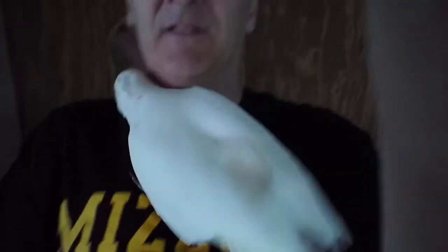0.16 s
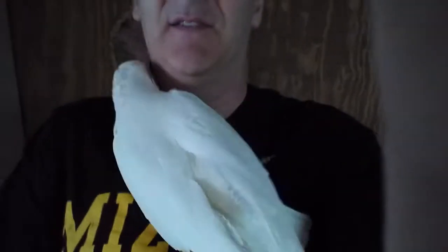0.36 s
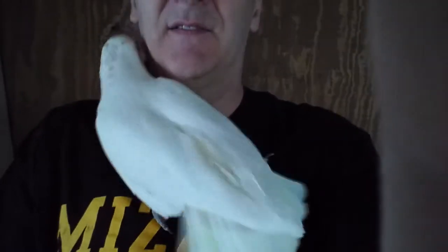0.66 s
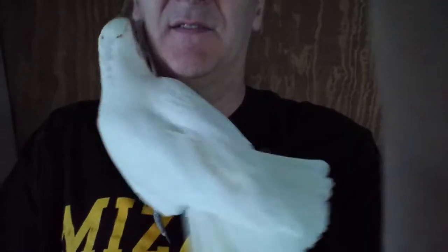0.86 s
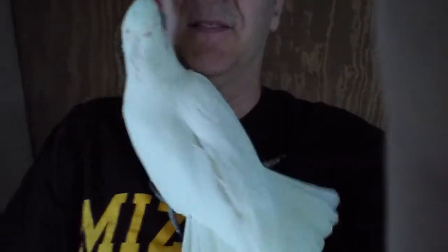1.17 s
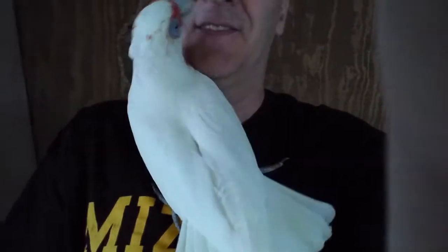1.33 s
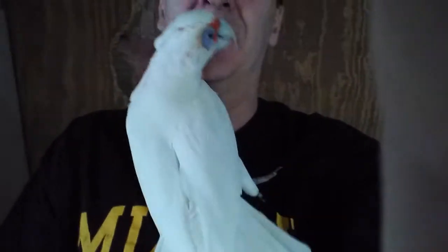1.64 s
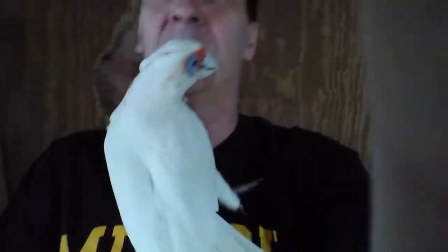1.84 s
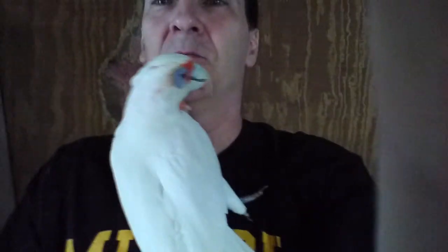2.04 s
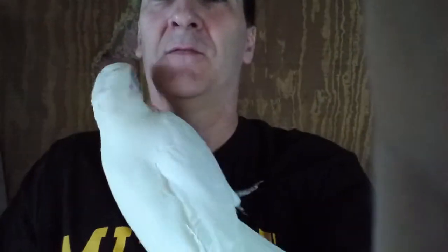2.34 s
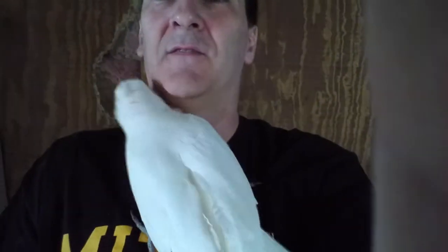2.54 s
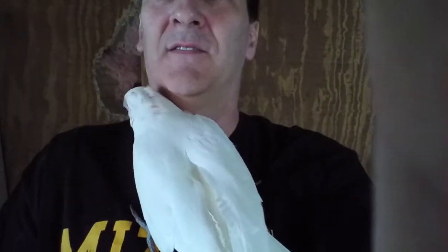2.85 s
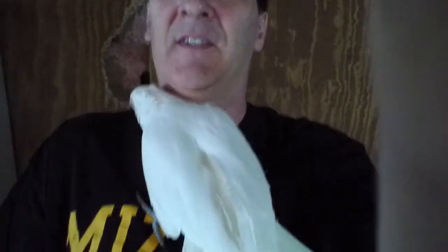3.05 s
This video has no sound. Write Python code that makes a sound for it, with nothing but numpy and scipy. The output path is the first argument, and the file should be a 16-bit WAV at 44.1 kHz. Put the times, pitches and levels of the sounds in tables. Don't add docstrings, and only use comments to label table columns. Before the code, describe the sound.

Close parrot calls in a bare, hard-walled room: long rough screeches, a short rasp, squeaking croaks, low mutters and high whistles, one final trilled screech, then faint rustles over low fan, hum and hiss.

```python
import sys
import numpy as np
from scipy import signal
from scipy.fft import rfft, irfft, next_fast_len
from scipy.io import wavfile
from scipy.ndimage import uniform_filter1d, minimum_filter1d, map_coordinates

SR = 44100
rng = np.random.default_rng(int(sys.argv[2]) if len(sys.argv) > 2 else 0)


def master(y):
    cut = np.clip(np.atleast_2d(y).T, -1, 1)
    pcm = np.round(cut * 32767)
    wavfile.write(sys.argv[1], SR, pcm.astype(np.int16))


def ratio_of_db(decibels):
    return 10 ** (np.asarray(decibels, float) / 20)


N = 141120

# start_s, length_s, start_pitch_hz, end_pitch_hz, level_db
SCREECH_CALLS = [
    (-.35, 0.24, 1258, 1233, -13),
    (.1, 0.62, 1268, 1240, -14.5),
    (1.05, .6, 1250, 1224, -14.5),
    (1.972, .58, 1238, 1216, -13.5),
]
RASP_CALLS = [
    (.655, .13, 970.4, 851, -15.5),
]
CROAK_CALLS = [
    (.845, 0.145, 910.7, 900.7, -13),
    (1.045, 0.142, 918.3, 903.5, -17),
    (1.225, 0.12, 894, 876, -32.5),
]
MUTTER_CALLS = [
    (1.48, .2, 537.3, 627.6, -26.5),
    (1.755, 0.14, 688, 696, -27),
]
RUSTLE_CALLS = [
    (2.71, 0.07, 896, 935, -41),
    (2.8, 0.048, 883, 925, -42),
]
SQUEAK_CALLS = [
    (.818, .026, 2900, 2740, -11),
    (.824, .014, 2750, 2450, -16),
    (.832, .03, 3820, 3600, -12),
    (1.013, .028, 2790, 2850, -12),
    (1.02, .035, 3860, 3580, -13),
    (1.203, .03, 3720, 3500, -13),
]
WHISTLE_CALLS = [
    (1.618, .08, 4450, 4500, -19),
    (1.735, .05, 4480, 4490, -27),
    (1.745, .025, 4850, 4860, -30),
    (1.76, .12, 6800, 6750, -39),
]
TRILL_CALLS = [
    (1.85, 0.029, 666, 677, -25),
    (1.885, .155, 662.2, 647, -20.5),
    (2.085, 0.057, 687.6, 675, -22),
]

# frequency_hz, level_db
SCREECH_COLOUR = [(500, -20.5), (950, -21.5), (1300, -10.5), (2000, -4), (2900, -8), (6600, -9),
                  (9000, -22), (15500, -41.5)]
RASP_COLOUR = [(500, -36), (800, -14.5), (1400, -21.5), (1900, -1.5), (3300, -4.5), (4500, -8), (8000, -23),
               (15500, -50)]
CROAK_COLOUR = [(500, -26.5), (800, -14.5), (1400, -41), (1850, 2), (2750, -2), (5500, -20.5), (8000, -25),
                (15500, -68)]
MUTTER_COLOUR = [(400, -13), (620, -7.5), (1200, -3), (2500, -8.5), (4500, -17.5), (9000, -29.5),
                 (15500, -65)]
RUSTLE_COLOUR = [(800, -22), (3300, 0), (6700, -8), (10000, -15), (15500, -25)]
SQUEAK_COLOUR = [(1300, -40), (2300, 0), (4000, 0), (5600, -10), (7500, -15), (11000, -30), (15500, -44)]
WHISTLE_COLOUR = [(2500, -40), (4000, 0), (7000, 0), (9000, -30), (15500, -45)]
TRILL_COLOUR = [(400, -40), (660, -11), (1300, -1), (1960, 0), (2600, -7), (3300, -30), (9000, -75)]

# centre_hz, width_hz, lift_db
SCREECH_PIPE = [(1336, 77, 8.5), (2507, 870, 7), (3460, 700, 3.5), (6050, 950, 0), (11240, 550, -9)]
CROAK_PIPE = [(1923, 54, -8), (2800, 530, -0.5), (3630, 120, 9.5), (5500, 470, 15), (6900, 390, 6.5),
              (9370, 130, 22), (11000, 390, 20), (12500, 500, 17)]

# frequency_hz, t60_s
ROOM_DECAY = [(300, 0.2), (1300, 1), (2500, 0.82), (6000, 0.57), (12000, 0.1)]
# frequency_hz, left_over_right_db
PORT_BALANCE = [(300, -7.5), (1000, -1), (2500, -7), (4000, -6.5), (6500, -18.5), (9000, -4), (11500, -1),
                (15000, 34.5)]
# time_s, level_db
THUMP_EVENTS = [
    (.02, -42),
    (.49, -32.5),
    (0.531, -34.5),
    (.61, -36),
]
# frequency_hz, density_db
FAN_COLOUR = [(21, -49), (35, -2), (123, -2.5), (161, -2.5), (476, -6.5), (593, -8), (1500, -13),
              (1950, -54), (3300, -120)]
# frequency_hz, likeness (1 = identical)
FAN_LIKENESS = [(60, 1), (300, 0.99), (700, 0.91), (1500, 0.035)]
# frequency_hz, level_db
HUM_PARTIALS = [(58, -48.5), (120, -48.5), (185, -59)]
# frequency_hz, density_db
HISS_COLOUR = [(590, 7), (1000, -5), (1940, 1), (4050, -9.5), (6480, -5.5), (8150, -15), (10700, -15),
               (13000, -25), (15500, -24)]
# frequency_hz, level_db
MICROPHONE_RESPONSE = [(25, -11), (40, -5), (52, 1), (13200, 0), (14300, -10.5), (16000, -12)]


def unit(x):
    return x / np.sqrt(np.mean(x ** 2) + 1e-20)


def along(points, hz):
    f, v = np.transpose(points)
    return np.interp(np.log(hz + 1), np.log(f + 1), v)


def wobble(rate_hz, size):
    return map_coordinates(rng.standard_normal(6000), [np.arange(size) * rate_hz / SR], mode="wrap")


def filtered(x, response):
    m = next_fast_len(x.shape[-1] + 8192)
    spectrum = rfft(x, m) * response(np.fft.rfftfreq(m, 1 / SR))
    return irfft(spectrum, m)[..., :x.shape[-1]]


def lift(peaks, hz):
    return sum(db / (1 + (2 * (hz - centre) / width) ** 2) for centre, width, db in peaks)


def voice(calls, throat, jitter, shimmer_db, breath, attack_s, release_s, trill_hz=0, trill_db=0, pipe=()):
    out = np.zeros(N + 2 * SR)
    t = np.arange(SR * 3 // 4) / SR
    size = len(t)
    air_share = np.clip(breath, 0, 1)
    for start_s, length_s, hz0, hz1, db in calls:
        drift = jitter * wobble(260, size) + 0.3176 * jitter * wobble(25.04, size)
        hz = np.interp(t, [0, length_s], [hz0, hz1]) * (1 + drift)
        phase = 2 * np.pi * np.cumsum(hz) / SR
        harmonics = int(15500 // max(hz0, hz1))
        pulses = sum(np.cos(k * phase) for k in range(1, harmonics + 1))
        pulses = unit(pulses * ratio_of_db(shimmer_db * wobble(500, size)))
        air = unit((1 + np.cos(phase)) * rng.standard_normal(size))
        source = np.sqrt(1 - air_share) * pulses + np.sqrt(air_share) * air
        sound = unit(filtered(source, lambda f: ratio_of_db(along(throat, f) + lift(pipe, f))))
        shape = np.clip(t / attack_s, 0, 1) * np.clip((length_s - t) / release_s, 0, 1)
        beat_db = trill_db * (np.cos(2 * np.pi * trill_hz * t - 4.2) - 1)
        beat_db = beat_db + 1.06 * wobble(29.5, size)
        beat_db = beat_db + 2 * air_share * wobble(90, size)
        out[round((start_s + 1) * SR):][:size] += ratio_of_db(db + beat_db) * shape * sound
    return out


def screeches():
    return voice(SCREECH_CALLS, SCREECH_COLOUR, jitter=.035, shimmer_db=5, breath=.55,
                 attack_s=.046, release_s=.11, pipe=SCREECH_PIPE)


def rasps():
    return voice(RASP_CALLS, RASP_COLOUR, jitter=.07, shimmer_db=5, breath=.6, attack_s=.0055, release_s=.064)


def croaks():
    return voice(CROAK_CALLS, CROAK_COLOUR, jitter=.04, shimmer_db=4.5, breath=.45,
                 attack_s=.004, release_s=.035, pipe=CROAK_PIPE)


def mutters():
    return voice(MUTTER_CALLS, MUTTER_COLOUR, jitter=.015, shimmer_db=.5, breath=.033,
                 attack_s=.0065, release_s=.074)


def rustles():
    return voice(RUSTLE_CALLS, RUSTLE_COLOUR, jitter=.303, shimmer_db=3, breath=1,
                 attack_s=.0056, release_s=.021)


def squeaks():
    return voice(SQUEAK_CALLS, SQUEAK_COLOUR, jitter=.012, shimmer_db=2, breath=.08, attack_s=.004, release_s=.01)


def whistles():
    return voice(WHISTLE_CALLS, WHISTLE_COLOUR, jitter=.0047, shimmer_db=4.9, breath=.0081,
                 attack_s=.012, release_s=.034)


def trills():
    return voice(TRILL_CALLS, TRILL_COLOUR, jitter=.0059, shimmer_db=1.2, breath=.0074,
                 attack_s=.01, release_s=.006, trill_hz=30, trill_db=5)


def at_ports(x, lag_s):
    sides = np.array([[-.5], [.5]])
    return filtered(x, lambda f: np.exp(2j * np.pi * f * lag_s * sides))


def room(rough, clear):
    hz, t, z = signal.stft(rng.standard_normal((2, SR)), SR, nperseg=256)
    decay_db = -60 * t / along(ROOM_DECAY, hz)[:, None]
    tail = signal.istft(z * ratio_of_db(decay_db), SR, nperseg=256)[1]
    tail = tail / np.linalg.norm(tail[0])
    send = np.pad(ratio_of_db(-1) * rough + ratio_of_db(-5) * clear, (130, 0))
    wet = signal.fftconvolve(send[None], tail, axes=1)[:, :len(rough)]
    direct = ratio_of_db(-4) * at_ports(rough, lag_s=.0002) + at_ports(clear, lag_s=.00004)
    return (direct + wet)[:, SR:SR + N]


def thumps():
    t = np.arange(N) / SR
    width_s = .025
    puffs = sum(ratio_of_db(db) * np.exp(-((t - s) / width_s) ** 2) for s, db in THUMP_EVENTS)
    noise = rng.standard_normal(N)
    return puffs * unit(filtered(noise, lambda f: np.exp(-np.log((f + 1) / 150) ** 2 / .5)))


def fan():
    def spread(f):
        angle = np.arccos(np.clip(along(FAN_LIKENESS, f), -1, 1)) / 2
        return ratio_of_db(along(FAN_COLOUR, f)) * [np.cos(angle), np.sin(angle)]

    mid, side = filtered(rng.standard_normal((2, N)), spread)
    return ratio_of_db(-43) * unit(np.array([mid + side, mid - side]))


def hum():
    t = np.arange(N) / SR
    out = np.zeros(N)
    for hz, db in HUM_PARTIALS:
        level = ratio_of_db(db + 3 + 2 * wobble(9, N))
        out += level * np.sin(2 * np.pi * hz * t + .4 * wobble(6, N))
    return out


def hiss():
    noise = rng.standard_normal((2, N))
    return ratio_of_db(-42.5) * unit(filtered(noise, lambda f: ratio_of_db(along(HISS_COLOUR, f))))


def scene():
    rough = screeches() + rasps() + croaks() + mutters() + rustles()
    clear = squeaks() + whistles() + trills()
    heard = ratio_of_db(2.5) * room(rough, clear) + hiss()
    sides = np.array([[.5], [-.5]])
    ports = filtered(heard, lambda f: ratio_of_db(along(PORT_BALANCE, f) * sides))
    low = (hum() + thumps()) * ratio_of_db(np.array([[.8], [-.8]]))
    return ports + fan() + low


def top_cut(x):
    return signal.sosfilt(signal.butter(12, 15640, fs=SR, output="sos"), x)


def record(dry):
    x = filtered(dry, lambda f: ratio_of_db(along(MICROPHONE_RESPONSE, f)))
    span = int(.005 * SR)
    need = np.minimum(1, .95 / (np.abs(x) + 1e-9))
    gain = uniform_filter1d(minimum_filter1d(need, span), span)
    return top_cut(x * gain)


dry = scene()
out = record(dry)
master(out)
```